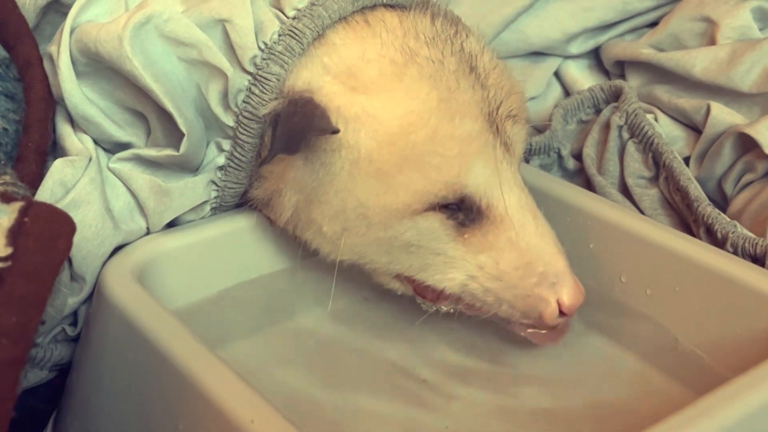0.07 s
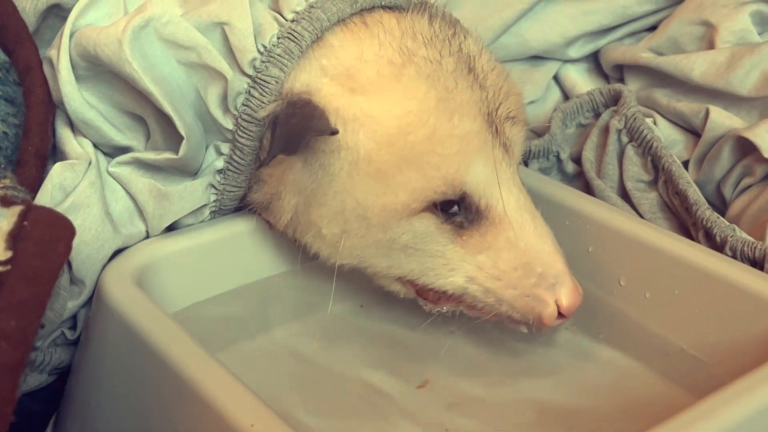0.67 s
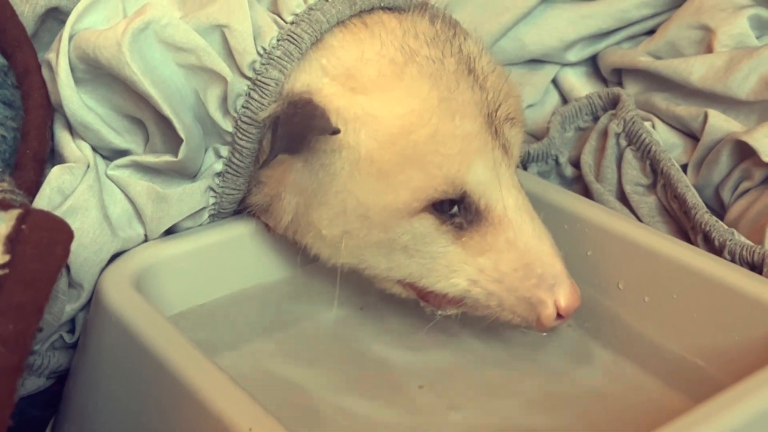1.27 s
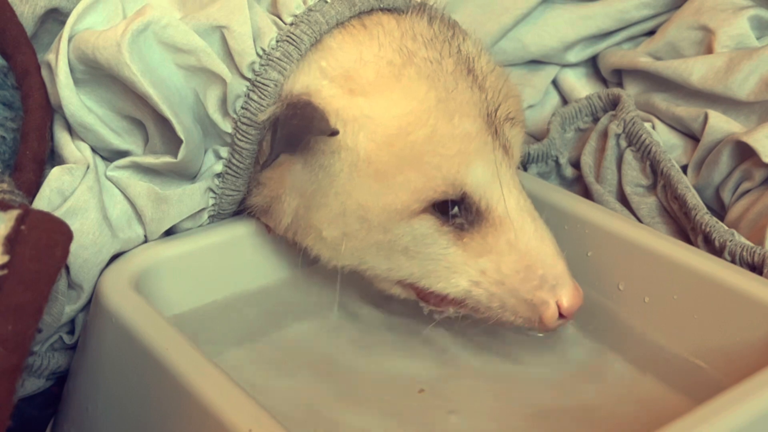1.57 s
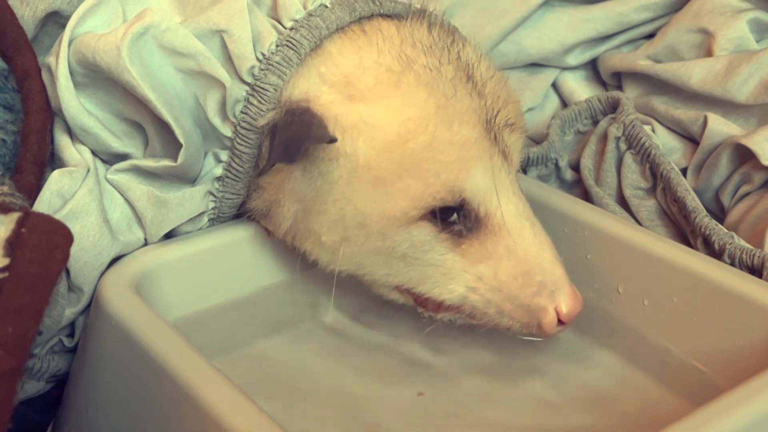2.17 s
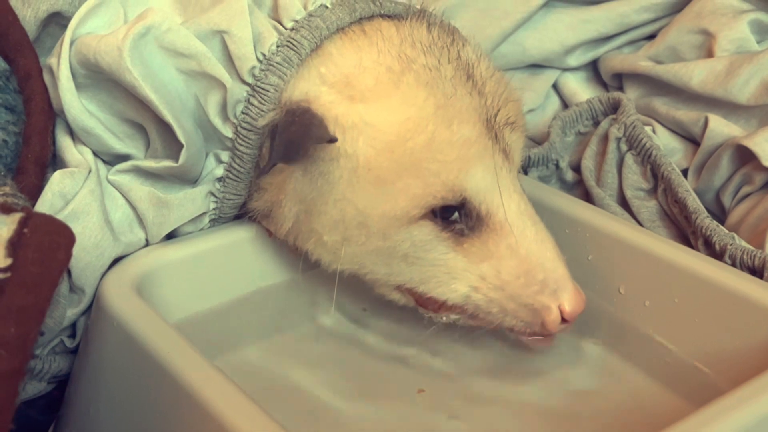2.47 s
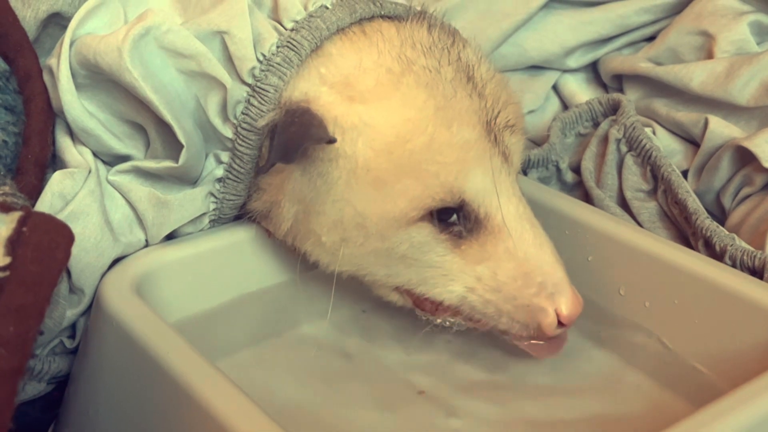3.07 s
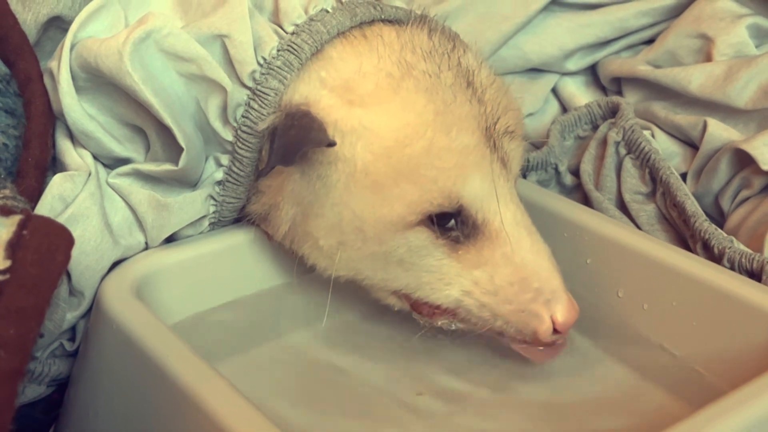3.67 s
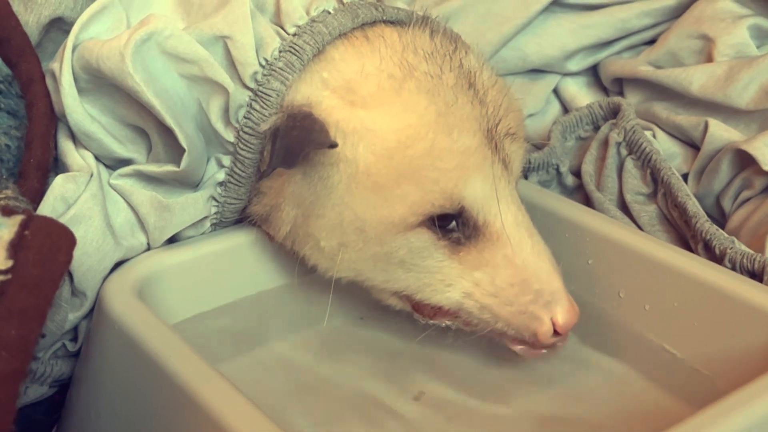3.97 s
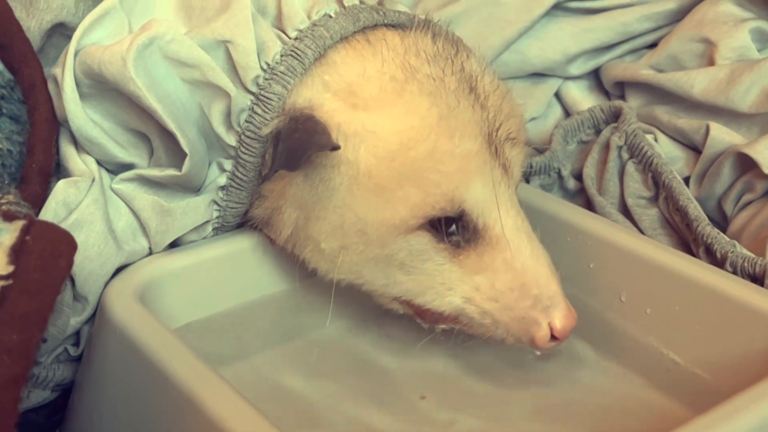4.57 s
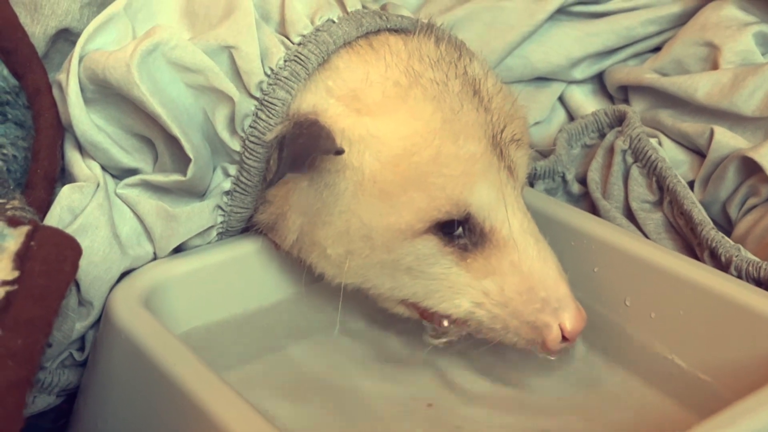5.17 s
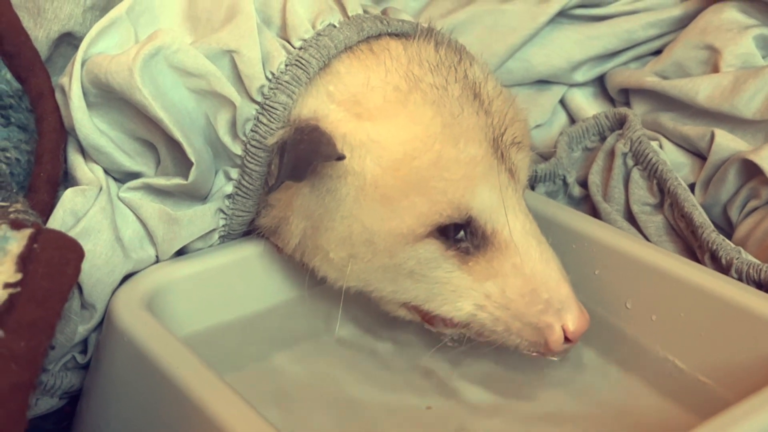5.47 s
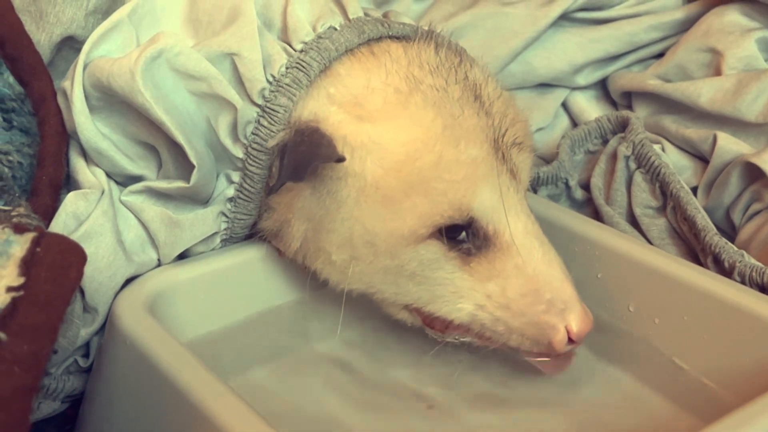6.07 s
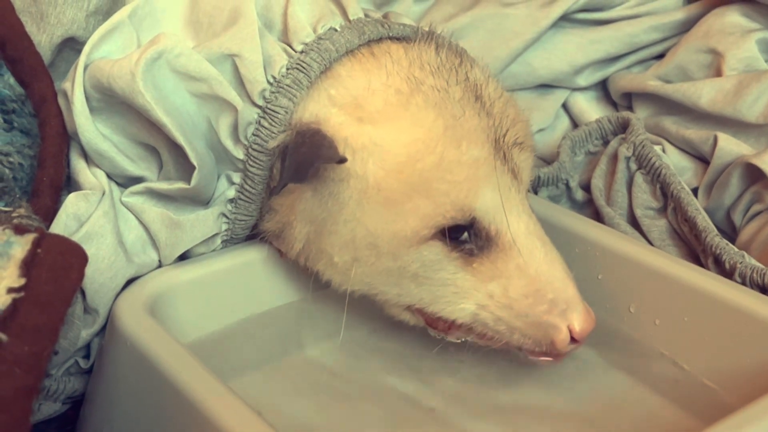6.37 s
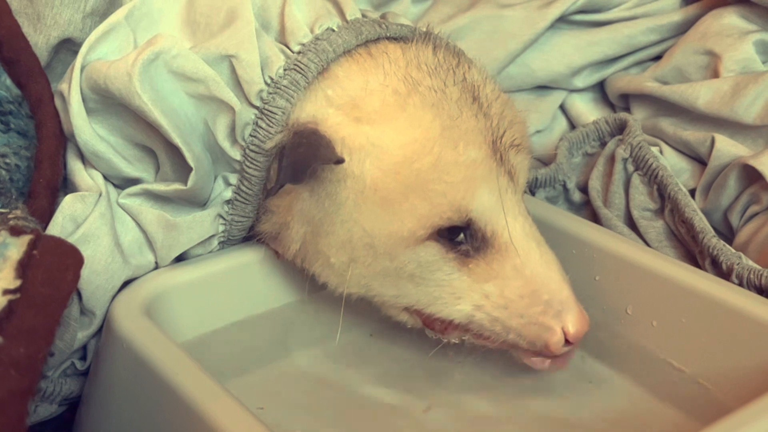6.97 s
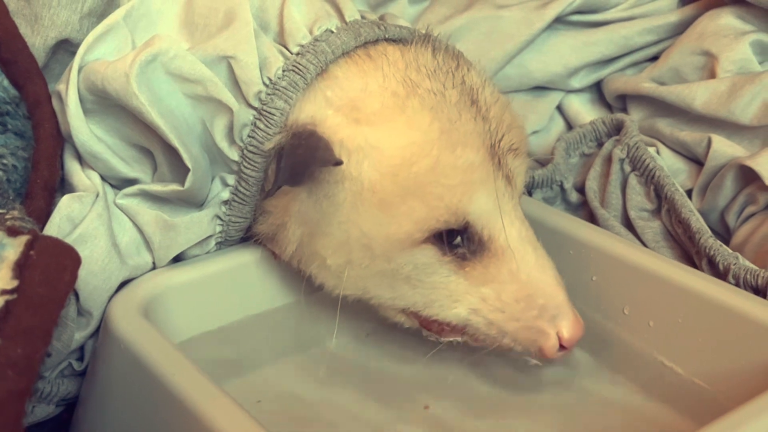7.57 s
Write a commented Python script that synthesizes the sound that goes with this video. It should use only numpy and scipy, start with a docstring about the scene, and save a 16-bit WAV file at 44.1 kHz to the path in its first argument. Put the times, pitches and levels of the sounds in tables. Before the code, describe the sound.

An opossum laps water steadily from a plastic tub, close up, with quick wet pops and smacks over a faint room hum.

```python
"""A quiet room, a two-port microphone close to an opossum lapping water from a plastic tub.
From the start an appliance hums over a faint rush of air; the animal laps nearly four times a second.
Each lap opens with a soft dip of the tongue, then saliva films snap and a short slurp swells.
It ends in a quick cluster of hollow pops as the mouth closes on the water, often with a gulp.
The tub echoes and rings with each lap, and a faint room tail follows."""
import sys
import numpy as np
from scipy import signal
from scipy.fft import rfft, irfft, next_fast_len
from scipy.io import wavfile

SR = 44100
rng = np.random.default_rng(int(sys.argv[2]) if len(sys.argv) > 2 else 0)


def log_audio(samples):
    """Write samples as a 16-bit WAV file to the path given in sys.argv[1]."""
    # one column per channel
    frames = np.atleast_2d(samples).T
    # limit to full scale, then quantise
    limited = np.clip(frames, -1, 1)
    pcm = np.round(limited * 32767).astype(np.int16)
    wavfile.write(sys.argv[1], SR, pcm)


N = 344421

# one row per lap: (climax time [s], build-up [s], die-away [s], froth level [dB],
# stirred water level [dB], spray level [dB], slurp level [dB], slurp pitch [Hz])
LAPS = [(.224, .015, .018, -31, -37, -56, -33, 1550), (.482, .01, .013, -33, -36, -55, -35, 1750),
        (.749, .008, .02, -28, -39.5, -63, -35, 1350), (1.021, .014, .021, -31, -47, -63, -39, 1450),
        (1.286, .012, .023, -32, -33.5, -61, -34, 1550), (1.56, .013, .008, -37, -37.5, -60, -30.5, 1650),
        (1.832, .014, .029, -37, -34.5, -58, -36, 1600), (2.1, .012, .012, -32, -46, -59, -39, 1750),
        (2.406, .022, .0097, -27.5, -36.5, -67, -31.5, 1600),
        (2.684, .023, .0061, -32, -35, -58, -34, 1700), (2.957, .014, .014, -34, -36, -65, -30.5, 1550),
        (3.218, .003, .036, -31, -41, -65, -35, 1700), (3.523, .01, .0071, -34.5, -37, -57, -34, 1800),
        (3.788, .014, .018, -27.5, -36, -65, -38, 1550), (4.069, .014, .011, -34, -34, -56, -34, 1800),
        (4.337, .013, .019, -31.5, -35, -59, -39, 1650), (4.611, .016, .011, -27, -35.5, -62, -31.5, 1700),
        (4.879, .014, .022, -40, -37, -68, -41, 1600), (5.145, .006, .021, -28, -39, -57, -33, 1500),
        (5.409, .003, .022, -27.5, -38.5, -61, -36, 1700), (5.701, .021, .006, -33, -35, -65, -39, 1400),
        (5.964, .005, .017, -26, -36.5, -60, -35, 1800), (6.24, .01, .015, -34, -35.5, -56, -33, 1300),
        (6.544, .01, .008, -39, -43, -57, -34, 1700), (6.811, .008, .008, -32, -36, -57, -33, 1550),
        (7.081, .016, .029, -29, -34.5, -61, -43, 1400), (7.36, .016, .011, -36, -33, -63, -34, 1550),
        (7.641, .021, .018, -34, -39, -60, -37, 1500)]
DIP_LEAD_S = .075  # the water is stirred this long before the climax of a lap


def from_db(db):
    """Decibels to gain."""
    return 10 ** (np.asarray(db) / 20)


def rms_one(x):
    """Scale to unit rms."""
    return x / np.sqrt(np.mean(x ** 2) + 1e-20)


def add(track, s, sound):
    """Mix a sound into a track from time s on."""
    start = int(np.clip(round(s * SR), 0, N - 1))
    track[start:start + len(sound)] += sound[:N - start]


def delayed(x, s):
    """The same sound s seconds later."""
    size = next_fast_len(N + SR // 10)
    shift = np.exp(-2j * np.pi * np.fft.rfftfreq(size, 1 / SR) * s)
    return irfft(rfft(x, size) * shift, size)[:N]


def coloured_noise(spectrum):
    """Steady noise of unit rms, shaped by rows of (frequency [Hz], level [dB])."""
    size = next_fast_len(N)
    hz, level_db = np.transpose(spectrum)
    gain = from_db(np.interp(np.log(np.fft.rfftfreq(size, 1 / SR) + 1), np.log(hz), level_db))
    return rms_one(irfft(rfft(rng.standard_normal(size)) * gain, size)[:N])


def bubble(hz, swell_s, glide=0, roundness=1):
    """A damped cavity swells and dies quickly; glide lifts its pitch, roundness softens its attack."""
    age = np.arange(int(12 * swell_s * SR) + 2) / (SR * swell_s)
    pitch = hz * (1 + glide * np.tanh(age / 2 - .5))
    envelope = (age * np.exp(1 - age)) ** roundness
    return envelope * np.sin(2 * np.pi * np.cumsum(pitch) / SR)


def froth(count, hz, scatter, spread_s, swell_s, fall=0):
    """Small bubbles, centred 3 spreads after the start; pitch sinks by the share fall per spread."""
    burst = np.zeros(N // 20)
    for when, detune, size in rng.standard_normal((count, 3)):
        ratio = np.exp(scatter * 2 * np.tanh(detune / 2) - fall * when)
        grain = 2 * np.tanh(size * .6) * bubble(hz * ratio, swell_s / ratio) / np.sqrt(count)
        start = int(np.clip(when + 3, 0, 6) * spread_s * SR)
        burst[start:start + len(grain)] += grain
    return burst


def air(common_db=-47, apart_db=-53, in_tub_db=-48):
    """Room tone: a steady rush of air, which also sounds the hollow of the tub."""
    # air common to both ports: (frequency [Hz], relative level [dB])
    common_spectrum = [(25, -21), (42, -2), (140, 5), (420, -7.5), (680, -14), (900, -11), (1650, -12.5),
                       (2300, -21.5), (2800, -22.5), (3270, -28.5), (3620, -22.5), (4050, -24.5),
                       (4480, -22.3), (4720, -27), (4950, -26.5), (5850, -36), (6550, -37.5), (7000, -42.5),
                       (7500, -48), (8100, -62.5), (12300, -54), (14000, -72)]
    # air that differs between the ports: (frequency [Hz], relative level [dB])
    apart_spectrum = [(30, -19), (55, -0.5), (280, -3.5), (420, -7.5), (620, -8.5), (870, -4.5),
                      (1600, -4.5), (2250, -16.5), (2600, -13), (3050, -15), (3430, -20), (3750, -18.5),
                      (4250, -26), (4700, -23.5), (5200, -22.5), (6700, -35.5), (8400, -36.5),
                      (11000, -54.5), (14000, -73.5)]
    common = from_db(common_db) * coloured_noise(common_spectrum)
    apart = from_db(apart_db) * coloured_noise(apart_spectrum) * [[1], [-1]]
    return common + apart + tub_ring(from_db(in_tub_db) * coloured_noise(common_spectrum))


def hum():
    """An appliance in the background: motor and mains tones beat against a narrow unsteady drone."""
    # its tones: (frequency [Hz], level [dB], unsteady share [0-1], width [Hz])
    tones = [(96.7, -49.4, 0.12, 1), (120.56, -45, 0.42, 2.6), (125.5, -47.5, 0.95, 6.2),
             (193.3, -54.5, .2, 1.2)]
    # the hum slowly swells and eases: (time [s], level [dB])
    swell = [(0, -.8), (2, -.4), (2.8, 1.2), (4.3, 1), (5.3, -.5), (6.2, .4), (7.8, -1.2)]
    t, out = np.arange(N) / SR, np.zeros(N)
    for hz, db, unsteady, width_hz in tones:
        pole = np.exp(-2 * np.pi * width_hz / SR)
        noise = rng.standard_normal((2, N + SR))
        drift = rms_one(signal.lfilter([1], [1, -2 * pole, pole * pole], noise)[:, SR:])
        swing = np.sqrt(2 * (1 - unsteady ** 2)) + unsteady * (drift[0] + 1j * drift[1])
        out += from_db(db) * np.real(swing * np.exp(2j * np.pi * (hz * t + rng.random())))
    return out * from_db(np.interp(t, *np.transpose(swell)))


def room(x, onset_s=.0027):
    """A faint diffuse tail, unrelated between the ports; each half-octave dies at its own rate."""
    # the room's decay: (frequency [Hz], time to fall 60 dB [s], level [dB])
    decay = [(300, 0.11, -14.5), (1360, 0.27, -19), (3950, 0.071, 6.5), (8100, 0.14, -26.5),
             (13000, .1, -34.5)]
    hz, t60, level_db = np.transpose(decay)
    t, tail = np.arange(SR // 2) / SR, 0
    edges_hz = 150 * 2 ** np.arange(0, 7, .5)
    for low, high in zip(edges_hz, edges_hz[1:]):
        log_centre = np.log(low * high) / 2
        fade = from_db(-60 * t / np.interp(log_centre, np.log(hz), t60)) * (1 - np.exp(-t / onset_s))
        gain = from_db(np.interp(log_centre, np.log(hz), level_db))
        half_octave = signal.butter(2, [low, high], "band", fs=SR, output="sos")
        band = signal.sosfilt(half_octave, rng.standard_normal((2, len(t))))
        tail = tail + band * fade / np.linalg.norm(fade) * gain
    return signal.fftconvolve(x[None], tail, axes=1)[:, :N]


def tub_echoes(x, dull_hz=4500):
    """Close reflections, dulled by fur and bedding, slightly different at each port."""
    # echoes off the water and the tub walls: (delay [s], left level [dB], right level [dB])
    echoes = [(.0017, -23.5, -32), (.0031, -22.5, -17.5), (.0052, -26.5, -27.5), (.0074, -17.5, -15.5),
              (0.0105, -18, -20.5), (0.0168, -20, -19)]
    dull = signal.sosfilt(signal.butter(2, dull_hz, fs=SR, output="sos"), x)
    return sum(from_db([[left_db], [right_db]]) * delayed(dull, s) for s, left_db, right_db in echoes)


def tub_ring(x, travel_s=.002003):
    """Standing waves between the water and the walls, each reaching the two ports a little apart."""
    # resonances of the tub's hollow: (frequency [Hz], width [Hz], level [dB])
    modes = [(810, 170, -15), (1376, 65, -6), (1490, 19, -12), (1630, 270, -19)]
    out = np.zeros((2, N))
    for hz, width_hz, db in modes:
        ringing = signal.lfilter(*signal.iirpeak(hz, hz / width_hz, fs=SR), x)
        arrivals_s = travel_s + rng.uniform(0, .46, 2) / hz
        out += from_db(db) * np.array([delayed(ringing, s) for s in arrivals_s])
    return out


def at_ports(x, pan_db, lag_s=5.7e-5):
    """Direct sound reaches the microphone's left port first; positive pan_db favours the left."""
    return np.array([x, delayed(x, lag_s)]) * from_db([[pan_db / 2], [-pan_db / 2]])


def fizz(leaving_db=-47.5, closing_db=-19.5, spray_trim_db=1.5):
    """The wet tongue crackles as it leaves the water and through the pops, and flicks a fine spray."""
    out = np.zeros(N)
    for s, build_s, fade_s, froth_db, _, spray_db, *_ in LAPS:
        leaving = froth(count=70, hz=4700, scatter=.3, spread_s=.025, swell_s=.0005)
        closing = froth(count=40, hz=5900, scatter=.27, spread_s=.21 * (build_s + fade_s), swell_s=.0006)
        spray = froth(count=30, hz=9600, scatter=.07, spread_s=.026, swell_s=.0002)
        add(out, s - DIP_LEAD_S - .07, from_db(leaving_db) * leaving)
        add(out, s - build_s - .009, from_db(froth_db + closing_db) * closing)
        add(out, s - DIP_LEAD_S - .055, from_db(spray_db + spray_trim_db) * spray)
    return out


def tongue(dip_db=-1.0, wash_db=-.5, spread_s=.026):
    """A wash of stirred water opens each lap, mostly with a soft plop as the tongue meets the surface."""
    # the plops: (time [s], level [dB], pitch [Hz])
    dips = [(0.159, -40, 1700), (0.681, -35, 1070), (0.929, -42, 990), (1.231, -40, 1330),
            (1.485, -34.5, 1450), (1.748, -32.5, 1110), (2.33, -41.5, 990), (2.601, -49, 1300),
            (2.883, -36, 1310), (3.162, -37.5, 1360), (3.465, -42.0, 1370), (3.731, -38, 1590),
            (4.0, -30, 1190), (4.271, -37.0, 1160), (4.536, -38, 1420), (4.813, -35.5, 1170),
            (5.07, -41, 1140), (5.344, -34.5, 1300), (5.627, -33, 1320), (5.889, -35.5, 1280),
            (6.161, -38.5, 1120), (7.002, -41, 1140), (7.295, -32, 1210), (7.558, -41, 1140)]
    out = np.zeros(N)
    for s, db, hz in dips:
        add(out, s, from_db(db + dip_db) * bubble(hz, swell_s=.00093, glide=.048))
    for s, _, _, _, db, *_ in LAPS:
        wash = froth(count=40, hz=1160, scatter=.38, spread_s=spread_s, swell_s=.0007)
        add(out, s - DIP_LEAD_S - 3 * spread_s, from_db(db + wash_db) * wash)
    return out


def faint_snaps(scatter_db=1.0, cycles=2.1):
    """One faint snap of saliva at each of three stages of every lap, its time, level and pitch random."""
    # the stages: (lead before the climax [s], spread [s], level [dB], pitch [Hz], scatter [log ratio])
    stages = [(0.047, 0.013, -55, 5400, .16), (.045, 0.01, -53.5, 2400, 0.15),
              (0.0012, 0.011, -49, 4500, .2)]
    snaps = []
    for s, *_ in LAPS:
        for lead_s, spread_s, db, hz, scatter in stages:
            late, loud, sharp = np.clip(rng.standard_normal(3), -2, 2)
            start_s = s - lead_s + spread_s * late
            snaps.append((start_s, db + scatter_db * loud, hz * np.exp(scatter * sharp), cycles))
    return snaps


def lips(ring_db=1.0, crack_db=-3.5, splutter_db=-5.0, spray_db=-16.5):
    """A saliva film tears in a brief splutter: a crack begins a short bright ring, amid a fine spray."""
    # the clearest snaps at the lips: (time [s], level [dB], pitch [Hz], swell [cycles])
    snaps = [(0.1743, -48.5, 2360, 3.5), (0.209, -47.5, 2700, 0.46), (.2098, -51, 9000, 1.2),
             (.384, -54, 12000, 1), (.399, -48, 7330, 0.91), (0.418, -44, 4270, 2.5),
             (0.434, -38.5, 4640, 2.8), (0.4388, -40.5, 2330, 4.1), (.4335, -46, 10000, 2.4),
             (.4445, -38, 11200, 2.8), (.45, -43, 5200, 2), (.563, -50, 6500, 1.6), (0.709, -41.5, 2230, 2),
             (.752, -59, 8500, 1.3), (.9723, -46, 2350, 3.7), (0.9751, -45, 9090, 4.9),
             (1.238, -44.5, 2340, 3.8), (1.2845, -48, 5560, 2), (1.285, -54, 8500, 1.6),
             (1.4457, -50, 6540, 2.2), (1.4661, -44, 7260, 1.9), (1.5017, -43.5, 2200, 3),
             (1.5055, -51, 8300, 1.5), (1.5102, -47, 8540, 3.4), (1.5108, -54, 13200, 1.6),
             (1.515, -44.5, 5170, 1.85), (1.744, -38.5, 3900, 1.12), (1.7445, -49, 9000, 1.2),
             (1.7804, -50, 9500, 2.6), (1.7806, -53, 13500, 1.4), (1.9938, -48, 12000, 1.1),
             (2.052, -52, 9000, 1.5), (2.3036, -40, 4940, 1.6), (2.3842, -41.5, 2530, 1.2),
             (2.3844, -38, 5800, 7.1), (2.637, -49, 3420, .7), (2.6805, -56, 9000, 1.4),
             (2.87, -36, 4940, 1.5), (2.9495, -47, 5500, 2), (2.958, -48, 2860, 1.3),
             (3.269, -46, 3763, 1.7), (3.187, -48, 4400, 2), (3.217, -51, 7000, 1.2),
             (3.4404, -35.5, 3076, .9), (3.4407, -35, 4960, 1.7), (3.458, -46, 9200, 3),
             (3.466, -47, 4300, 2), (3.5228, -43, 2514, 1.8), (3.773, -55, 8800, 1.6),
             (3.952, -54, 9000, 1.4), (3.9926, -32, 5130, 0.74), (3.993, -33, 2480, 1.5),
             (3.9932, -49, 9000, 1.3), (4.0255, -46, 3170, 1), (4.0716, -43, 5340, 2.8),
             (4.072, -53, 9000, 1.8), (4.185, -47.5, 4530, 3.6), (4.4249, -42.5, 6600, 3.5),
             (4.561, -40.5, 4230, 1.2), (4.578, -46, 4900, 2), (4.597, -47, 6000, 2),
             (4.6067, -44, 8600, 3.2), (4.607, -44, 5600, 2), (4.6162, -48, 5200, 2),
             (4.8155, -50, 6300, 1.4), (5.0975, -53, 9400, 1.4), (5.1385, -57, 9000, 1.3),
             (5.1584, -44, 3770, 2.1), (5.4098, -52, 8600, 1.6), (5.411, -38.5, 5430, 4.2),
             (5.4243, -38, 4000, 1.4), (5.454, -52, 8700, 1.7), (5.6083, -43.5, 3510, 0.87),
             (5.7004, -45, 3790, 2), (5.959, -60, 9000, 1.2), (5.9655, -32.5, 2290, 1.8),
             (5.976, -36, 5200, 2.2), (5.9848, -44, 7600, 3), (6.1572, -38.5, 2530, 0.32),
             (6.192, -42.5, 2370, 3.5), (6.486, -45, 10100, 2), (6.4863, -48, 12300, 1.5),
             (6.5426, -37, 2300, 1.3), (6.757, -48, 4400, 2), (6.768, -48, 2300, 1.8),
             (7.035, -48.5, 2270, 2.6), (7.063, -52, 4100, 1.6), (7.0815, -55, 8450, 2.2),
             (7.0818, -45, 5400, 1.8), (7.3, -43.5, 3300, 1.9), (7.578, -54, 10000, 1.4),
             (7.6348, -38, 8310, 3.2)]
    splutter_s, spray_s, spray_hz = .0012, .0081, 9000
    skirt_ratio, top_hz = 2 ** .85, 12700  # the band kept around a snap's pitch, and its highest edge
    out = np.zeros(N)
    for s, db, hz, cycles in snaps + faint_snaps():
        band = signal.butter(2, [hz / skirt_ratio, min(hz * skirt_ratio, top_hz)], "band", fs=SR)
        ring = bubble(hz, swell_s=cycles / hz, glide=.027)
        crack = bubble(1.09 * hz, swell_s=.79 / hz)
        splutter = froth(count=7, hz=hz, scatter=.14, spread_s=splutter_s, swell_s=1.1 / hz)
        spray = froth(count=20, hz=np.sqrt(hz * spray_hz), scatter=.22, spread_s=spray_s, swell_s=.00026)
        add(out, s, from_db(db + ring_db) * signal.lfilter(*band, ring))
        add(out, s, from_db(db + crack_db) * signal.lfilter(*band, crack))
        add(out, s - 2 * splutter_s, from_db(db + splutter_db) * signal.lfilter(*band, splutter))
        add(out, s - 2 * spray_s, from_db(db + spray_db) * spray)
    return out


def slurp(slurp_db=-.3, spread_s=.008, early_s=.003):
    """Water drawn over the tongue swells ahead of each climax, sinking in pitch as the mouth fills."""
    out = np.zeros(N)
    for s, build_s, *_, db, hz in LAPS:
        drawn = froth(count=40, hz=hz, scatter=.2, spread_s=spread_s, swell_s=.0009, fall=.025)
        add(out, s - build_s - early_s - 3 * spread_s, from_db(db + slurp_db) * drawn)
    return out


def mouth(pop_db=-.48, thud_db=-25, froth_db=-5.5, lather_db=-8.0, low_hz=170, top_hz=2400):
    """Pops, each with a dull thud and wrapped in froth, and low gulps, all muffled by the cheeks."""
    # the mouth closes on the water: (time [s], level [dB], pitch [Hz])
    pops = [(0.2102, -30.5, 1340), (0.2198, -32, 1400), (0.2244, -21, 1406), (0.2334, -32.5, 1360),
            (.2454, -35.5, 1390), (0.471, -31.5, 1480), (0.4763, -30.5, 1460), (0.4813, -25.5, 1270),
            (0.4861, -26.5, 1380), (0.4975, -29.5, 1500), (.5037, -35, 1390), (0.7397, -29, 1150),
            (0.748, -25.5, 1360), (.7537, -31, 1250), (0.7561, -22.0, 1360), (0.7621, -30.5, 1450),
            (0.7687, -36, 1390), (1.0064, -29.5, 1260), (1.015, -31.5, 1270), (1.0211, -21.5, 1310),
            (1.026, -26, 1386), (1.0315, -34, 1420), (1.0398, -35, 1430), (1.27, -35, 1380),
            (1.2749, -32, 1380), (1.2783, -29.5, 1210), (1.2864, -20, 1330), (1.2895, -27, 1300),
            (1.2975, -36, 1320), (1.3078, -33, 1400), (1.5466, -34, 1520), (1.554, -30, 1310),
            (1.5602, -25, 1440), (1.5707, -39, 1480), (1.812, -33.5, 1390), (1.8197, -29, 1550),
            (1.826, -33, 1530), (1.832, -24.3, 1430), (1.8405, -33, 1280), (2.0883, -30, 1410),
            (2.0973, -29, 1410), (2.1003, -19.8, 1380), (2.1057, -25, 1360), (2.111, -27.0, 1340),
            (2.1141, -31, 1290), (2.3834, -27, 1780), (2.3932, -27.5, 1480), (2.3978, -36, 1390),
            (2.4024, -24.5, 1340), (2.4062, -29.5, 1390), (2.4152, -33.5, 1380), (2.6627, -33, 1530),
            (2.669, -31, 1450), (2.675, -25.5, 1380), (2.6842, -21, 1450), (2.6961, -37, 1390),
            (2.9424, -29, 1570), (2.9571, -19.5, 1440), (2.9643, -29, 1510), (2.9674, -29, 1480),
            (2.9776, -35, 1480), (3.2134, -35, 1410), (3.2163, -9, 1430), (3.2249, -26.5, 1410),
            (3.234, -24.5, 1490), (3.2417, -28.5, 1640), (3.2518, -33, 1450), (3.5084, -38, 1490),
            (3.5141, -30.5, 1455), (3.5174, -29.5, 1510), (3.523, -17.5, 1510), (3.542, -36, 1480),
            (3.7748, -24.5, 1650), (3.7793, -27.5, 1330), (3.7836, -28, 1340), (3.792, -24.5, 1340),
            (3.7995, -28.5, 1390), (3.8086, -32, 1410), (4.057, -29.5, 1500), (4.0702, -20.5, 1430),
            (4.0754, -29, 1470), (4.0809, -31, 1465), (4.0884, -33, 1500), (4.324, -30, 1290),
            (4.3346, -21.5, 1230), (4.3425, -21, 1360), (4.3473, -29.5, 1430), (4.35, -36, 1430),
            (4.595, -27.5, 1570), (4.6036, -27, 1500), (4.6081, -33, 1360), (4.6122, -24, 1400),
            (4.6228, -31.0, 1455), (4.8621, -36, 1610), (4.868, -28, 1510), (4.87, -31, 1470),
            (4.8791, -25.5, 1500), (4.8874, -32.5, 1500), (4.8956, -32.5, 1440), (5.1395, -28.5, 1610),
            (5.144, -26, 1180), (5.154, -26.5, 1360), (5.1617, -31, 1435), (5.4066, -34.5, 1340),
            (5.4097, -13.3, 1210), (5.4203, -20.5, 1424), (5.4378, -33, 1270), (5.6767, -37, 1600),
            (5.6824, -31.5, 1413), (5.6874, -32, 1530), (5.6918, -27, 1420), (5.7008, -29, 1460),
            (5.951, -34, 1700), (5.959, -29, 1250), (5.9645, -22.5, 1500), (5.9672, -27, 1800),
            (5.9744, -26.5, 1560), (5.979, -33, 1390), (5.9846, -40, 1560), (6.2293, -30.5, 1340),
            (6.2351, -33.5, 1145), (6.2404, -23.5, 1290), (6.2487, -26.5, 1350), (6.261, -35, 1450),
            (6.5345, -33.5, 1870), (6.5424, -28, 1410), (6.552, -32.5, 1360), (6.562, -37, 1450),
            (6.8055, -35, 1420), (6.8126, -20, 1240), (6.818, -31.5, 1350), (7.0642, -33, 1220),
            (7.0745, -32.0, 1490), (7.0819, -25.5, 1270), (7.0868, -25.5, 1370), (7.1046, -36, 1380),
            (7.1096, -38, 1370), (7.342, -33.5, 1530), (7.3464, -33, 1330), (7.3556, -36, 1290),
            (7.3595, -26.5, 1360), (7.3674, -31, 1360), (7.3715, -31.0, 1280), (7.618, -32, 1440),
            (7.6407, -28, 1390), (7.648, -32.5, 1420), (7.66, -35, 1440)]
    # the deeper laps end in a gulp: (time [s], level [dB], pitch [Hz], level of its low knock [dB])
    gulps = [(.485, -30, 870, -52), (0.747, -32, 850, -50), (1.279, -31.5, 830, -54),
             (2.098, -35.5, 790, -50), (3.2166, -23.5, 660, -35), (3.519, -30, 820, -49),
             (3.784, -33.5, 790, -50), (4.0703, -27.5, 1040, -52), (4.335, -27, 810, -49),
             (4.600, -30, 850, -49), (4.8674, -24, 860, -48), (5.144, -30.5, 800, -42),
             (5.409, -27.5, 890, -47), (5.960, -34, 800, -54), (7.075, -36.5, 730, -53)]
    glide, roundness, crest_s = .047, 2.07, .00085  # a pop crests crest_s after its time
    hard_pop_db, spread_s = -23, .0046
    out = np.zeros(N)
    for (s, db, hz), slow in zip(pops, rng.standard_normal(len(pops))):
        hardness_db = db - hard_pop_db  # harder pops swell faster and thud more
        swell_s = (.001242 + .00011 * np.clip(-hardness_db, -1.5, 8)) * np.exp(.099 * slow)
        thud = bubble(.22 * hz, swell_s=.0006)
        foam = froth(count=14, hz=1.07 * hz, scatter=.25, spread_s=spread_s, swell_s=.00095, fall=.04)
        add(out, s + crest_s - swell_s, from_db(db + pop_db) * bubble(hz, swell_s, glide, roundness))
        add(out, s, from_db(db + thud_db + .6 * hardness_db) * thud)
        add(out, s - 3 * spread_s, from_db(min(db, -29) + froth_db) * foam)
    for s, db, hz, knock_db in gulps:
        add(out, s, from_db(db) * bubble(hz, swell_s=.0014, glide=glide, roundness=roundness))
        add(out, s, from_db(knock_db) * bubble(.83 * hz, swell_s=.00047))
    for s, _, fade_s, db, *_ in LAPS:  # each lap dies away in froth
        lather = froth(count=28, hz=1370, scatter=.13, spread_s=.5 * fade_s, swell_s=.0011)
        add(out, s - .52 * fade_s, from_db(db + lather_db) * lather)
    low_cut = signal.butter(3, low_hz, "high", fs=SR, output="sos")
    cheeks = signal.butter(5, top_hz, fs=SR, output="sos")
    return signal.sosfilt(np.vstack([low_cut, cheeks]), out)


def scene(spit_echo_db=-5.5, spit_room_db=-7.5, ring_db=.1):
    """Close lapping over the room's background; the bright snaps stay drier than the pops."""
    water = tongue() + slurp() + mouth()
    spit = lips() + fizz()
    direct = at_ports(water, pan_db=-.4) + at_ports(spit, pan_db=2.5)
    tub = tub_echoes(water + from_db(spit_echo_db) * spit) + from_db(ring_db) * tub_ring(water)
    tail = room(water + from_db(spit_room_db) * spit)
    return direct + tub + tail + hum() + air()


def record(dry):
    """The deepest bass is cut gently and the top steeply."""
    low_hz, top_hz = 27, 14000
    thinned = signal.sosfilt(signal.butter(2, low_hz, "high", fs=SR, output="sos"), dry)
    return signal.sosfilt(signal.ellip(8, .2, 80, top_hz, fs=SR, output="sos"), thinned)


dry = scene()
out = record(dry)
log_audio(out)
```